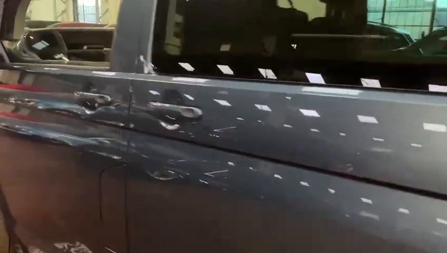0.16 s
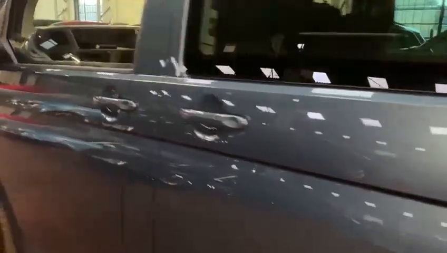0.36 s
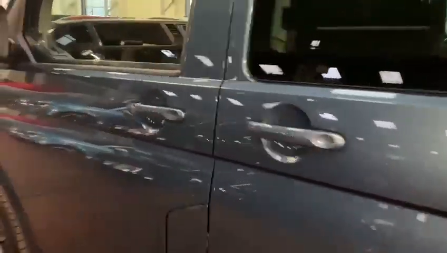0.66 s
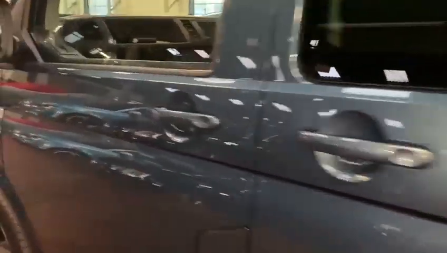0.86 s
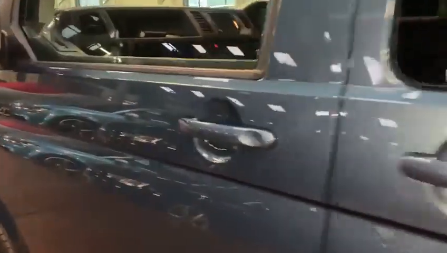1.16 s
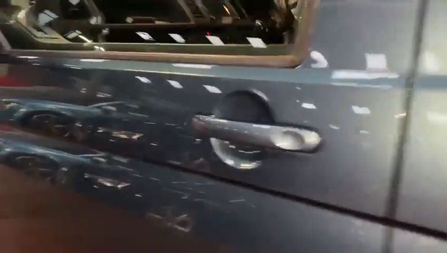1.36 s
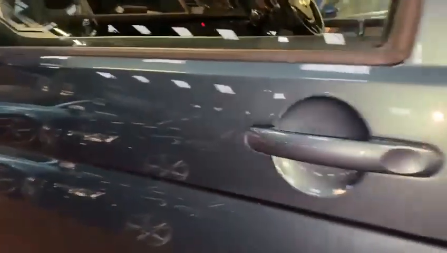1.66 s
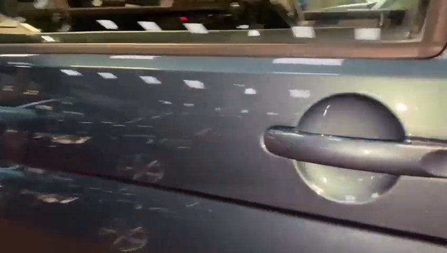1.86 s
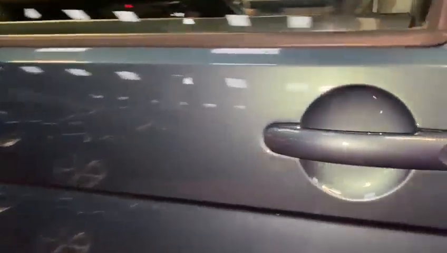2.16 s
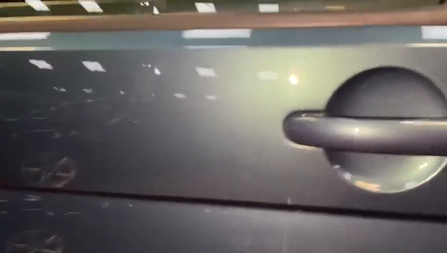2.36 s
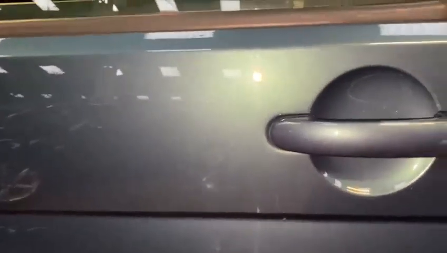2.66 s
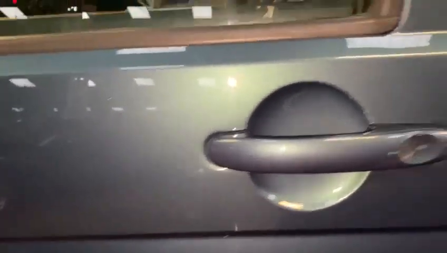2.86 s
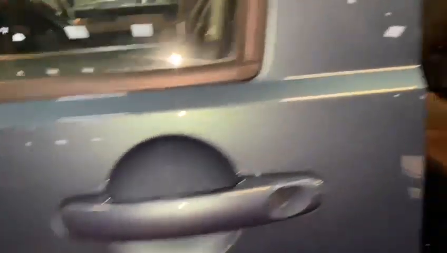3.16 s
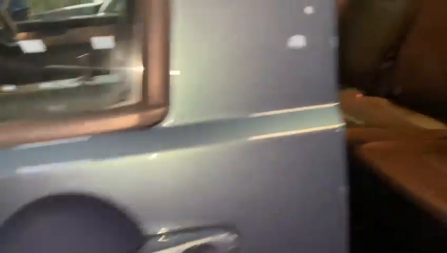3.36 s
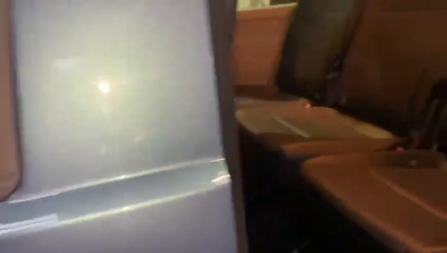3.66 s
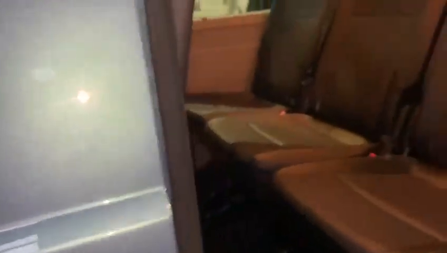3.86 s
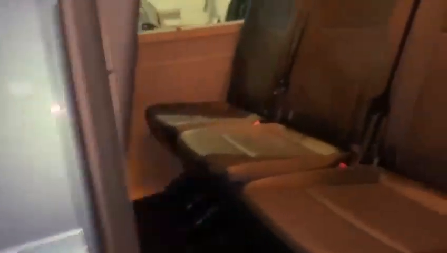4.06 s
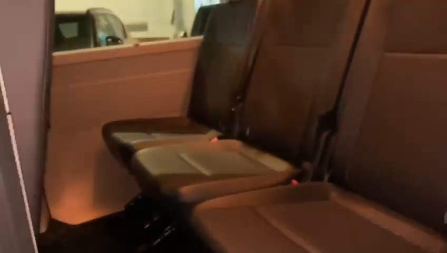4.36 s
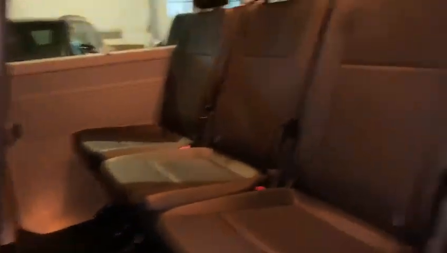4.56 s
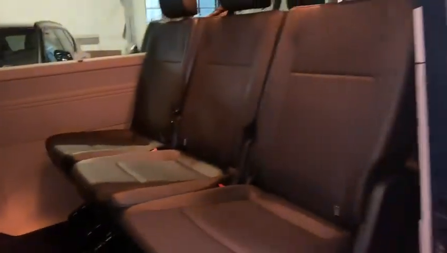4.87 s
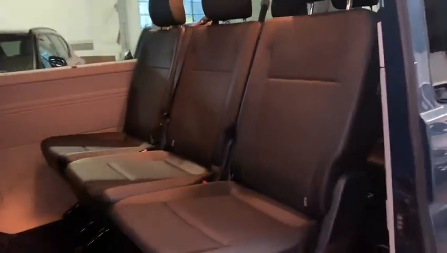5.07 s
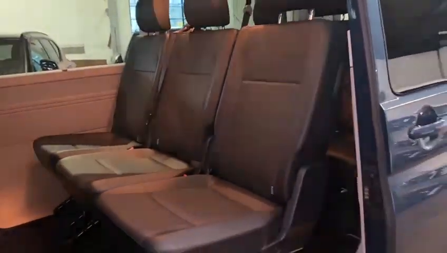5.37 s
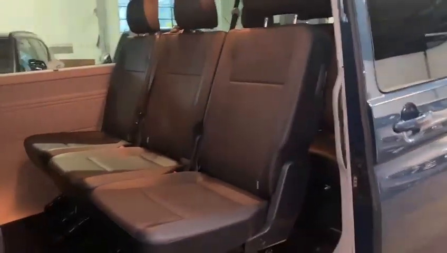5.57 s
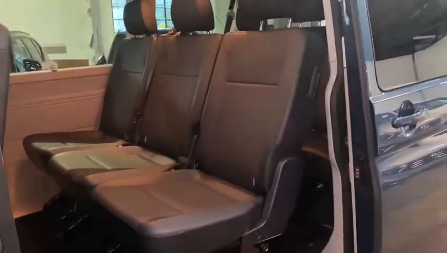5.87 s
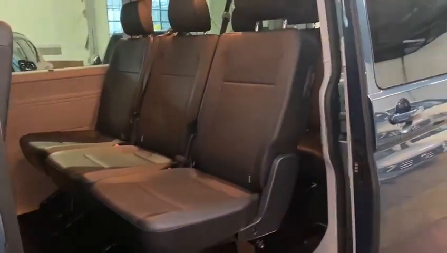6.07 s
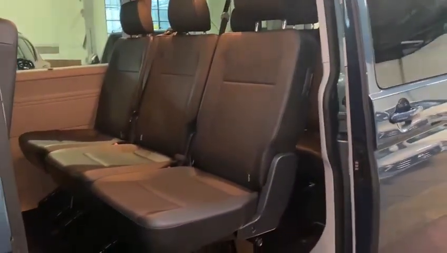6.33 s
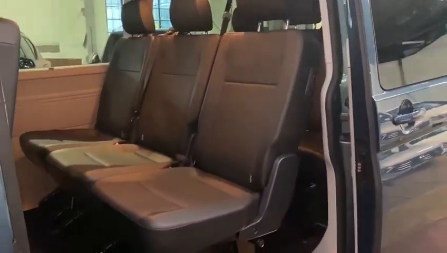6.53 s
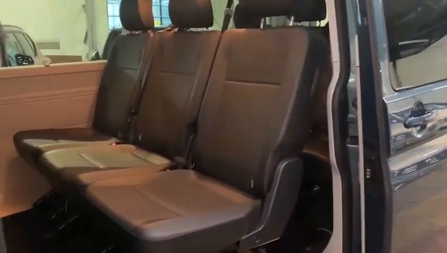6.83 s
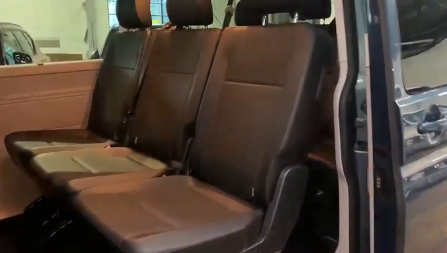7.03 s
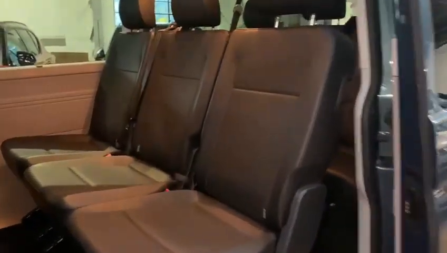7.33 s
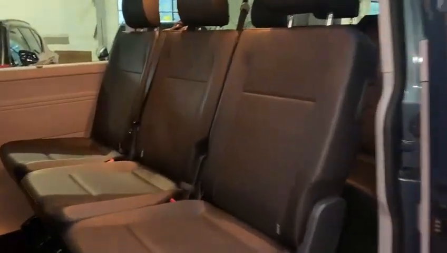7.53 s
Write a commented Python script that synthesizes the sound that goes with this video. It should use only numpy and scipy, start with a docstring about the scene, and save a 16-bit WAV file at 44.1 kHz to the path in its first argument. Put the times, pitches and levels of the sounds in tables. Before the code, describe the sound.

A phone held near a powered sliding door picks up low airy room tone, faint rustling and two gritty creaks. A light knock leads to one very loud latch clack with a shuddering boom. Low motor drone and uneven roller rumble continue with knocks over rail joints, until a softer multiple thud ends the travel. The hall echoes faintly.

```python
"""Ventilation fills a showroom; shoes and clothes scuff near the phone, then a van's lock linkage creaks twice.
The drive hums, the latch lets go with a clack, and the powered door rolls open, bumps over joints and thuds home.
Air, strokes, rolling and slips are shaped noise; blows and taps are damped modes; drive and hums are sines.
The phone stands close to the door, its two ports heard as a sum and a difference; the hall answers softly."""
import sys
import numpy as np
from scipy import signal
from scipy.fft import rfft, irfft, next_fast_len
from scipy.io import wavfile
from scipy.ndimage import uniform_filter1d, map_coordinates

SR = 44100
rng = np.random.default_rng(int(sys.argv[2]) if len(sys.argv) > 2 else 0)


def file_out(sig):
    """Save sig as 16-bit WAV at sys.argv[1]."""
    # one column per channel
    cols = np.atleast_2d(sig).T
    # limit, then scale
    lim = np.clip(cols, -1, 1)
    pcm = np.round(lim * 32767).astype(np.int16)
    wavfile.write(sys.argv[1], SR, pcm)


N = 339570

# Modes of carriage, rail and lock housing: (frequency [Hz], relative level [dB])
FRAME = [(323, 6.5), (377, 11), (450, 8), (528, 7.5), (587, -3), (700, 4.5), (780, 3.5), (880, 3),
         (960, -5.5), (1070, -6), (1180, -8), (1360, -8), (1610, -18)]


def amp(db):
    """dB to gain."""
    return 10 ** (np.asarray(db) / 20)


def unit(x):
    """Scale to rms 1."""
    return x / np.sqrt(np.mean(x ** 2) + 1e-20)


def peak(x):
    """Scale so that the first channel peaks at 1."""
    return x / np.abs(x[0]).max()


def along(points, hz):
    """Interpolate (Hz, value) points on a log frequency axis."""
    f, v = np.transpose(points)
    return np.interp(np.log(hz + 1), np.log(f + 1), v)


def curves(rows, outside=None):
    """One value per sample for each column after the time."""
    s, *cols = np.transpose(rows)
    return [np.interp(np.arange(N) / SR, s, c, outside, outside) for c in cols]


def wobble(rate):
    """A smooth random curve, rate knots a second."""
    knots = rng.standard_normal(int(N * rate / SR) + 4)
    return map_coordinates(knots, [np.arange(N) * rate / SR])


def uneven(n, size):
    """A random curve of rms 1, smoothed over size samples."""
    return unit(uniform_filter1d(rng.standard_normal(n), size=size))


def filtered(x, response):
    """Multiply the spectrum of x by a complex response of frequency."""
    n = x.shape[-1]
    m = next_fast_len(n + min(n, SR // 2))
    return irfft(rfft(x, m) * response(np.fft.rfftfreq(m, 1 / SR)), m)[..., :n]


def shape(points):
    """Response of a (Hz, dB) spectrum."""
    return lambda hz: amp(along(points, hz))


def resonances(peaks, power=1):
    """Causal response of (Hz, width Hz, dB) peaks with alternating signs; a power above 1 steepens the skirts."""
    def response(f):
        total = sum((-1) ** k * amp(db) * 1j * f * w / (c * c - f * f + 1j * f * w)
                    for k, (c, w, db) in enumerate(peaks))
        return total ** power
    return response


def gritty(n, spread_db):
    """Two noises of uneven grains that share their sizes."""
    return rng.standard_normal((2, n)) * amp(spread_db * rng.standard_normal(n))


def tone(rows, fade_s):
    """A sine that fades in and out at the ends of its (s, Hz, dB) curve."""
    hz, db = curves(rows)
    t = np.arange(N) / SR
    fade = np.clip(np.minimum(t - rows[0][0], rows[-1][0] - t) / fade_s, 0, 1)
    return np.sqrt(2) * amp(db) * fade * np.sin(2 * np.pi * np.cumsum(hz) / SR)


def place(out, s, burst):
    """Add a burst at s seconds."""
    out[:, round(s * SR):][:, :burst.shape[-1]] += burst


def ringing(hz, db, t60, centre_hz, spread, t):
    """Two channels of damped modes; those near the pitch of the struck spot ring strongest."""
    near_db = -(np.log2(hz / centre_hz) / spread) ** 2
    chance = rng.standard_normal((2, 2, len(hz), 1))
    scatter_db = 2.2 * chance[0]
    swing = np.sin(2 * np.pi * hz * (1 + 0.016 * chance[1]) * t)
    modes = amp(db + near_db + scatter_db - 60 * t / t60) * swing
    return -modes.sum(1) * (1 - np.exp(-t / 0.00062))  # the first swing is away from the phone


def hall():
    """Ventilation: a wavering rumble under a smooth rush of air whose treble stirs, and a late low hum."""
    # Spectra of deep rumble, air rush and hall treble: (frequency [Hz], relative level [dB per Hz])
    rumble, air, stir = [(25, -7), (40, 2), (54, 9.5), (75, -5.5), (110, -22), (160, -37.5)], [(50, -16), (80, 6.5), (150, -3), (284, -5.5), (480, -8),
                                         (945, -9.5), (1410, -13.5), (2340, -21.5), (3200, -24),
                                         (4600, -28.5), (7000, -49), (12400, -49)], [(1500, -22), (2500, -1), (5000, 1), (8000, 3),
                                                      (11000, -1.5), (12400, -11)]
    # The slow fade and return of the rumble: (time [s], level [dB])
    rumble_level = [(0, -50), (1, -53.5), (2, -54), (6.5, -62), (7.3, -51), (7.7, -54)]
    # A low hum after the door has stopped: (time [s], pitch [Hz], level [dB])
    hum = [(6.76, 71.5, -54), (6.89, 70.8, -50), (7.37, 70.8, -51), (7.45, 70, -56)]

    def noise(spectrum):
        return unit(filtered(rng.standard_normal((2, N)), shape(spectrum)))

    air_db = -56.5 + 0.8 * wobble(6)
    stir_db = -81 + 1.5 * wobble(9.8)
    rumble_db = curves(rumble_level)[0] + 0.13 * wobble(4.8)
    return amp(rumble_db) * noise(rumble) + amp(air_db) * noise(air) + amp(stir_db) * noise(stir) + tone(hum, 0.041)


def echo(x):
    """The hall's answer: decaying noise in which each frequency dies at its own speed."""
    # Decay of the hall: (frequency [Hz], t60 [s])
    decay = [(100, 0.55), (500, 0.62), (2000, 1), (10000, 1)]
    hz, t, z = signal.stft(rng.standard_normal((2, SR)), SR, nperseg=256)
    tail = signal.istft(z * amp(-60 * t / along(decay, hz)[:, None]), SR, nperseg=256)[1]
    late = np.pad(x, (500, 0))[None]  # 500 samples, about 11 ms
    return signal.fftconvolve(late, tail / np.linalg.norm(tail[0]), axes=1)[:, :N]


def rustle():
    """A faint rustle: narrow grainy noise that swells and flickers."""
    # Its resonances: (centre [Hz], width before squaring [Hz], level before squaring [dB])
    bands = [(3100, 750, 0), (4250, 900, -5)]
    # Its course: (time [s], level [dB])
    course = [(.8, -85), (.86, -69), (.97, -71), (1.08, -71), (1.2, -69), (1.3, -68), (1.45, -70),
              (1.62, -75), (1.72, -74)]
    grains = unit(filtered(gritty(N, spread_db=4), resonances(bands, 2)))
    return amp(curves(course, -120)[0] + 2.2 * wobble(16.3)) * grains


def rasps():
    """Linkage, shoes and clothes rub: quick bursts of grit with one hollow resonance and a short fade."""
    # Strokes: (time [s], level [dB], rise [s], length before the fade [s])
    strokes = [(0.21, -59, .003, 0.0091), (0.362, -60.5, .003, 0.0099), (0.49, -67, .003, 0.0079),
               (0.772, -51.5, .001, 0.023), (1.309, -45.5, 0.0041, 0.057), (1.559, -54, 0.015, 0.0088),
               (1.721, -42.5, 0.002, 0.046), (2.111, -54, .001, 0.05), (2.506, -52.5, 0.0056, 0.011),
               (3.463, -60.5, .003, 0.077), (3.654, -54.5, 0.007, 0.03), (4.37, -62.5, 0.018, 0.071),
               (4.664, -58.5, 0.01, 0.053), (4.493, -64.5, 0.022, 0.11), (4.903, -54.5, 0.042, 0.08),
               (5.292, -54.5, 0.02, 0.076), (5.579, -49, 0.014, 0.059), (5.932, -57.5, 0.0065, 0.1),
               (6.605, -58, 0.0081, 0.014), (6.783, -58, 0.0051, 0.037), (6.987, -55, 0.0012, 0.0025),
               (7.267, -65, 0.049, 0.17)]
    # Colour of the rubbing: (frequency [Hz], level [dB per Hz])
    grit_colour = [(80, 2), (150, -2), (400, 5.5), (1000, 16), (3000, 12.5), (6000, 10.5), (11000, 12),
                   (13000, -12)]
    # The hollow resonance added to it: (centre [Hz], width [Hz], level [dB])
    hollow = [(3740, 1200, -2.5)]
    out, t = np.zeros((2, N + SR)), np.arange(SR // 4) / SR
    for s, db, rise, length in strokes:
        stroke = np.clip(t / rise, 0, 1) * amp(-60 * np.maximum(t - length, 0) / 0.088)
        grit = gritty(len(t), spread_db=2.0) * amp(0.87 * uneven(len(t), 200))
        coloured = filtered(grit, lambda f: shape(grit_colour)(f) + resonances(hollow)(f))
        place(out, s, amp(db) * stroke * unit(coloured))
    return out[:, :N]


def linkage_slips():
    """Every slip of the lock linkage jolts its hollow parts with grit, strongest near the slip's own pitch."""
    # Slips of the lock linkage in two short creaks: (time [s], peak level [dB], pitch [Hz])
    slips = [(1.3135, -42.5, 4600), (1.317, -33, 1200), (1.323, -28.5, 1800), (1.327, -27.5, 1750),
             (1.333, -32, 1190), (1.339, -30, 1500), (1.343, -34.5, 3380), (1.350, -33, 1200),
             (1.354, -31, 1210), (1.362, -35, 1310), (1.367, -46.5, 4500), (1.7232, -38, 1900),
             (1.728, -37, 1900), (1.734, -50, 1900), (1.741, -37, 2280), (1.748, -31, 2000),
             (1.755, -35, 1600), (1.759, -37.5, 4370), (1.763, -41, 2230), (1.769, -41, 2250),
             (1.775, -48, 1900)]
    # Resonances of the hollow linkage: (centre [Hz], width [Hz], level [dB])
    linkage = [(1120, 400, 6), (1820, 290, 4), (2460, 1400, 4), (3350, 480, 5.5), (4580, 530, 1),
               (7060, 1100, -3.5), (8700, 2200, -5)]
    slip_t60, slip_width = 0.024, 0.28  # s; width before squaring, as a share of the pitch
    out, t = np.zeros((2, N + SR)), np.arange(SR // 10) / SR
    for s, db, hz in slips:
        jolt = gritty(len(t), spread_db=5) * amp(-60 * t / slip_t60) * (1 - np.exp(-t / 0.0005))
        near = resonances([(hz, slip_width * hz, 0)], 2)
        slip = filtered(jolt, lambda f: resonances(linkage)(f) * (near(f) + 0.12))
        place(out, s, amp(db) * peak(slip))
    return out[:, :N]


def shudder():
    """The whole door shakes after latch and stop: a quick rise, then a steady decay of level."""
    # Shakes: (start [s], level before each layer's share [dB], t60 [s])
    shudders = [(2.26, -22.5, 0.65), (6.18, -29, 0.57)]
    rise_s = 0.025
    level = np.zeros(N)
    for s, db, t60 in shudders:
        since = np.maximum(np.arange(N) / SR - s, 0)
        level += amp(db - 60 * since / t60) * np.minimum(since / rise_s, 1)
    return level


def motor(drone_db):
    """The drive's hum: a wavering sine and its octave that follow the drone, half as strong in the difference."""
    motor_hz, waver, over_drone_db, overtone_db = 122.1, 0.045, -5, -10  # waver is relative
    turns = 2 * np.pi * np.cumsum(motor_hz * (1 + waver * wobble(11))) / SR
    hum = np.sqrt(2) * (np.sin(turns) + amp(overtone_db) * np.sin(2 * turns))
    return hum * amp(drone_db + over_drone_db + 1.5 * wobble(14)) * [[1], [0.5]]


def rolling():
    """Rail roughness shakes body, panel and carriage; lumps under the rollers swell all of it together."""
    # Body rocking on springs and floor; panel shaken by the drive; rollers and carriage:
    # (centre [Hz], width before the power [Hz], level before the power [dB])
    heave_peaks, drone_peaks, growl_peaks = [(42.2, 44, -4), (72, 103, -4.5)], [(96, 21, 5.5), (123.5, 21.2, 7),
                                                            (155.5, 14, 6.5)], [(212.5, 77, 0.5),
                                                                           (363.4, 92, -2.5),
                                                                           (428.6, 48.7, -0.5),
                                                                           (500, 60, -6.5), (673, 110, -14)]
    # Carriage rattle and treble hiss: (frequency [Hz], relative level [dB per Hz])
    rattle_colour, hiss_colour = [(300, -8.5), (550, 1.5), (700, -2), (1000, -4.5), (1400, -10.5),
                                  (2200, -24), (3500, -24), (6000, -35)], [(700, -7.5), (1300, 8), (2000, 3.5), (3000, 1),
                                                  (4500, -3.5), (7000, -9), (10500, -25), (13000, -6.5)]
    # The door in motion, before shaking is added: (time [s], roller growl [dB], treble [dB])
    roll = [(1.848, -42, -99), (2.07, -58.5, -66), (2.2, -46, -57.5), (2.55, -44.5, -53.5),
            (2.72, -42.5, -60.5), (2.88, -37.5, -66.5), (3.04, -34.5, -58), (3.15, -37, -77),
            (3.28, -44, -84), (3.6, -45.5, -59.5), (3.9, -40, -66.5), (4.08, -42.5, -65.5),
            (4.17, -38, -65.5), (4.27, -39.5, -62.5), (4.37, -39, -65), (4.46, -42, -59), (4.55, -41, -58),
            (4.78, -41.5, -63), (4.92, -43, -50.5), (5.08, -43, -50.5), (5.27, -44, -55.5),
            (5.36, -44.5, -50.5), (5.55, -47, -55), (5.7, -50.5, -48.5), (6.05, -48, -50), (6.45, -46, -54),
            (6.62, -58.5, -54), (6.78, -65, -62.5)]
    # Panel and body in motion, before shaking: (time [s], drone before a 2.5 dB cut [dB], heave [dB])
    drive = [(1.848, -53, -44.5), (2.17, -69, -52), (2.75, -49.5, -38.5), (3.14, -43.5, -46.5),
             (3.6, -41.5, -42), (4.0, -40.5, -44.5), (4.15, -36.5, -39), (4.28, -42, -42),
             (4.42, -34, -45.5), (4.7, -42.5, -44), (5.35, -37, -44.5), (5.75, -45, -47), (6.4, -37, -42),
             (6.62, -96, -46.5), (6.78, -81, -59)]
    # A short whine of the drive: (time [s], pitch [Hz], mean level [dB])
    whine_curve = [(3.05, 650, -52), (3.095, 668, -50), (3.32, 673, -49.5)]
    # The shaking's share in heave, drone, growl, rattle and hiss: (level [dB]) each
    shaken_db = (0.5, -14, -1, -13, -17)
    rattle_offset_db, treble_share = -2.5, 0.4  # rattle lies between growl and treble
    bend_start, bend_end, bend_db = 2.6, 3.46, 5.5  # s, s, dB: more rattle on the bent end of the rail

    growl_db, hiss_db = curves(roll, -120)
    drone_db, heave_db = curves(drive, -120)
    t = np.arange(N) / SR
    bend = np.clip(np.minimum(t - bend_start, bend_end - t) / 0.28, 0, 1)
    rattle_db = rattle_offset_db + growl_db + treble_share * (hiss_db - growl_db) + bend_db * bend
    shake = shudder() * amp(1.5 * wobble(50))  # loose parts make the shaking uneven
    levels_db = (heave_db, drone_db, growl_db, rattle_db, hiss_db)
    heave, drone, growl, rattle, hiss = (
        np.hypot(amp(db), amp(more_db) * shake) for db, more_db in zip(levels_db, shaken_db))
    lumps = wobble(22.17)

    def layer(response, gain, depth_db, spread_db):
        swell = amp(depth_db * lumps + depth_db * wobble(40))
        return gain * unit(swell * filtered(gritty(N, spread_db), response))

    whine = tone(whine_curve, 0.015) * amp(1.0 * wobble(45))
    flutter, slow_swell = amp(0.43 * wobble(110)), amp(1 * wobble(7))
    return (layer(resonances(heave_peaks, 2), heave, 0.55, 6.3)
            + layer(resonances(drone_peaks, 2), drone * amp(-2.5), 0.6, 2) + motor(drone_db)
            + layer(resonances(growl_peaks, 1.235), growl, 1.0, 3.8)
            + layer(shape(rattle_colour), rattle * flutter, 0.97, 3.3)
            + layer(shape(hiss_colour), hiss * slow_swell, 1.38, 3.8) + whine)


def taps(rows, modes, spread, rise_s):
    """A tap rings mainly the modes near its pitch, damped at once."""
    out, t = np.zeros((2, N + SR)), np.arange(SR // 10) / SR
    mode_hz, mode_db = np.transpose(modes)[..., None]
    for s, db, hz, t60 in rows:
        ring = ringing(mode_hz, mode_db, t60, hz, spread, t) * (1 - np.exp(-(t / rise_s) ** 2))
        place(out, s, amp(db) * peak(ring))
    return out[:, :N]


def rail_joints():
    """Rollers tap lightly on rail joints and ring the frame for a few cycles."""
    # Taps: (time [s], peak level [dB], pitch [Hz])
    joints = [(2.657, -35, 700), (2.661, -25, 816), (2.662, -40, 1370), (2.961, -38, 1170),
              (3.044, -29.5, 1010), (3.104, -44, 1610), (3.453, -46.5, 925), (4.462, -35, 586),
              (5.6095, -28.5, 790), (5.6305, -33, 850)]
    t60, spread = 0.019, 0.1  # s; octaves of the frame that ring
    return taps([(*row, t60) for row in joints], FRAME, spread, rise_s=0.0015)


def steel_contacts():
    """Hard contacts tick in small steel parts, with a much sharper onset."""
    # Contacts: (time [s], peak level [dB], pitch [Hz], t60 [s])
    contacts = [(1.8505, -47, 3330, .012), (2.2585, -22, 10400, .008), (2.2604, -9, 4700, .008),
                (2.2606, -17, 7200, .008), (2.2612, -17, 9200, .008), (3.045, -40, 3300, 0.012),
                (5.600, -48.5, 6860, .04), (5.622, -45, 5300, .07), (6.2465, -41, 2900, 0.014),
                (6.2525, -40, 3620, 0.017), (6.2585, -39, 3680, .015), (6.3685, -38, 2800, 0.01),
                (6.3765, -44, 3200, .015)]
    # Modes of the small parts: (frequency [Hz], relative level [dB])
    small_parts = [(2815, -4), (3257, -6), (3800, -6), (4420, 0), (4936, 0), (5300, -4), (6858, -3),
                   (7752, -2), (9232, 4), (10400, 4)]
    return taps(contacts, small_parts, spread=0.11, rise_s=0.00032)  # spread in octaves


def blows():
    """Each blow cracks in the latch steel, knocks the frame and booms in the door skin."""
    # Blows on the door: (time [s], boom peak [dB], boom pitch [Hz], knock level [dB], knock pitch [Hz],
    # crack peak [dB], main crack t60 [s])
    strikes = [(1.328, -40.5, 136, -39.5, 324, -70, .03), (1.849, -36, 210, -37, 510, -36, 0.031),
               (1.93, -53, 108, -47, 1260, -45.5, 0.026), (2.02, -35.5, 111, -45, 340, -56, .03),
               (2.159, -33, 131, -66, 330, -53, .03), (2.238, -25, 100, -36, 400, -44, 0.028),
               (2.2545, -22, 200, -25, 700, -44, 0.024), (2.2572, -12, 250, -8, 362, -18.5, 0.022),
               (2.2601, -32, 50.4, -13, 920, -19, 0.024), (2.2653, -19, 106, -18.5, 370, -20, 0.031),
               (2.266, -5.5, 199, -25.5, 448, -37, 0.04), (2.272, -11.5, 48.7, -34, 850, -42, 0.045),
               (2.277, -8, 160, -20, 440, -46, 0.045), (2.297, -14.5, 106, -45, 1090, -50, .06),
               (2.309, -30.5, 207, -21.5, 440, -47, .06), (2.33, -47, 205, -31, 880, -36, 0.042),
               (2.361, -28, 206, -31, 500, -46, 0.036), (2.395, -43, 151, -44, 400, -51, .05),
               (2.419, -34, 204, -34, 600, -52, .05), (2.441, -28.5, 122.4, -38, 547, -52, .05),
               (2.53, -27, 157, -37, 670, -53, 0.051), (2.664, -48, 187, -29, 775, -46, 0.028),
               (3.045, -24, 199, -39, 1200, -37.5, 0.035), (3.104, -29, 214, -44, 1500, -55, 0.035),
               (3.191, -24.5, 159, -43, 330, -65, .03), (3.221, -24, 132, -36, 335, -70, .03),
               (3.466, -41, 144, -36, 500, -53, 0.055), (3.484, -29.5, 198, -44, 1200, -60, .05),
               (3.515, -24, 200, -30.5, 464, -48, 0.066), (3.525, -47, 200, -34, 1160, -41.5, 0.031),
               (3.532, -26, 245, -29.5, 330, -46, 0.087), (3.545, -44, 110, -31, 604, -45, 0.12),
               (3.751, -25, 155, -50, 402, -65, .03), (4.141, -23.5, 120, -35, 440, -69, 0.038),
               (4.187, -46.5, 59.5, -34.5, 450, -55, 0.07), (4.39, -28.5, 62, -42, 524, -60, .03),
               (4.464, -32.5, 60, -40, 584, -53, 0.033), (5.965, -36, 240, -27, 436, -42, 0.033),
               (5.982, -21.5, 120, -28, 310, -56, .04), (6.167, -28, 110, -28, 660, -58, .05),
               (6.182, -19.5, 122, -38, 765, -54, .05), (6.191, -24.5, 129, -49, 330, -53, 0.045),
               (6.198, -20.5, 159, -32, 446, -48, 0.05), (6.202, -30, 172, -40, 900, -31.5, 0.049),
               (6.226, -26, 62, -46, 397, -46.5, 0.096), (6.246, -27, 50.3, -27.5, 1370, -26.5, 0.068),
               (6.253, -36.5, 125, -29, 1090, -34, 0.047), (6.259, -30, 165, -29.5, 1400, -34, 0.074),
               (6.271, -36, 190, -34, 1300, -41, .08), (6.28, -21.5, 138, -35, 824, -57, .06),
               (6.289, -47, 200, -38, 1100, -53, .06), (6.302, -34, 130, -38, 1000, -51, .06),
               (6.329, -42, 129, -40, 400, -57, .05), (6.368, -53, 130, -29.5, 950, -27.5, 0.088),
               (6.374, -40, 157, -30.5, 1330, -34, 0.1), (6.391, -26.5, 163, -37, 730, -50, 0.23),
               (6.384, -31, 200, -38, 1110, -43, 0.074), (6.404, -38, 201, -38, 600, -43, .08),
               (6.43, -37, 125, -45, 870, -50, .06)]
    # Modes of the door skin: (frequency [Hz], relative level [dB], t60 before a cut to 0.8 [s])
    skin = [(52.3, 10, 0.24), (64, -14, 0.21), (105, -10, 0.11), (123.1, 1, 0.22), (157.6, 3.5, 0.13),
            (203.3, 4, 0.16), (257.5, -6.5, 0.16)]
    # Resonances of the latch parts: (centre [Hz], width [Hz], level [dB])
    steel = [(1720, 1700, -12.5), (2800, 1430, -3), (4900, 2600, -7.5), (7230, 3700, -4.5),
             (10200, 6500, -7)]
    knock_t60 = 0.11  # s, at 500 Hz in the frame
    contact_hz, contact_s, contact_law = 3550, 0.04, 0.6  # pitch of a crack of this t60; shorter is higher
    clatter_db = 5  # loose parts make knock and crack uneven
    out, t = np.zeros((2, N + SR)), np.arange(SR // 3) / SR
    skin_hz, skin_db, skin_t60 = np.transpose(skin)[..., None]
    frame_hz, frame_db = np.transpose(FRAME)[..., None]
    frame_t60 = knock_t60 * (500 / frame_hz) ** 0.39
    for s, boom_db, boom_hz, knock_db, knock_hz, crack_db, crack_t60 in strikes:
        boom = ringing(skin_hz, skin_db, skin_t60 * 0.8, boom_hz, 0.13, t)
        loose = rng.standard_normal((2, 2, len(t)))

        # parts chatter while the frame rings
        chatter = amp(clatter_db * uneven(len(t), 250) * np.minimum(t / 0.018, 1))
        buzz = filtered(loose[0] * chatter * amp(-60 * t / knock_t60),
                        resonances([(knock_hz, 0.7 * knock_hz, 0)], 2))
        knock = peak(ringing(frame_hz, frame_db, frame_t60, knock_hz, 0.15, t)) + 0.95 * peak(buzz)

        # harder contacts reach higher modes
        crack_hz = min(contact_hz * (crack_t60 / contact_s) ** -contact_law, 5800)
        contact = resonances([(crack_hz, 0.85 * crack_hz, 0)])
        clatter = amp(clatter_db * uneven(len(t), 60) * np.minimum(t / 0.012, 1))
        decay = amp(-60 * t / crack_t60) + 0.18 * amp(-60 * t / 0.17)
        crack = filtered(loose[1] * clatter * decay, lambda f: resonances(steel)(f) * contact(f))
        place(out, s, amp(boom_db) * peak(boom) + amp(knock_db) * peak(knock) + amp(crack_db) * peak(crack))
    return out[:, :N]


def scene():
    """Two views of the sound field: what the ports share and what differs across them."""
    # The door's sound that both ports hear in step: (frequency [Hz], level before the aim [dB])
    lean = [(85, 7), (180, 12), (350, 4.5), (700, 5), (1400, -9.5), (2800, -30), (4000, -48)]
    # The phone turns from the door to the seats: (time [s], width [dB], lean [dB])
    aim = [(1.8, -1, -1.5), (2.3, -1, -4), (3.0, -2, -7), (4.0, -5, -10), (5.5, -0.5, -21),
           (6.1, -1.5, -12)]
    # Seats and lining swallow treble of the blows before the hall answers: (frequency [Hz], level [dB])
    absorbed = [(1500, 2.5), (8000, -7)]
    lean_rad = -2.1  # phase of the in-step part in the difference

    def in_step(x):
        return filtered(x[0], lambda hz: shape(lean)(hz) * np.exp(1j * lean_rad))

    hits = blows() + rail_joints()
    door = hits + steel_contacts() + rolling()  # ticks stay dry, without echo
    strokes = rasps() + linkage_slips() * amp([[0], [-7]])
    air = hall() + rustle()
    wide_db, lean_db = curves(aim)
    door = np.array([door[0], amp(wide_db) * door[1] + amp(lean_db) * in_step(door)])
    left = [[0], [1]] * (amp(-11) * strokes[0] + amp(-17) * in_step(air))  # strokes sit to the left
    answer = amp(-11.0) * echo(filtered(hits[0], shape(absorbed))) + amp(-12.0) * echo(strokes[0])
    return door + strokes + air + left + answer


def record(dry):
    """The phone's ports cancel in their sum near 8.6 kHz; peaks clip, then a steep low-pass ends the band."""
    # Sum and difference of the two ports: (frequency [Hz], level [dB])
    port_sum, port_difference = [(22, -6), (42, -4), (100, 0.2), (7500, 0), (8100, -12.5), (9200, -10),
                                 (9700, -1.5), (11500, -0.5), (12000, -21)], [(40, -28), (80, -20.5), (200, -10), (350, -8), (630, -0.5),
                                              (1140, 2.5), (2060, 0), (3720, -0.5), (7400, -2.5),
                                              (8500, 2.5), (9700, -2.5), (10300, -32)]
    top_hz = 12150
    mid, side = filtered(dry, lambda hz: np.array([shape(port_sum)(hz), shape(port_difference)(hz)]))
    return filtered(np.clip([mid + side, mid - side], -1, 1), lambda hz: hz < top_hz)


dry = scene()
out = record(dry)
file_out(out)
```